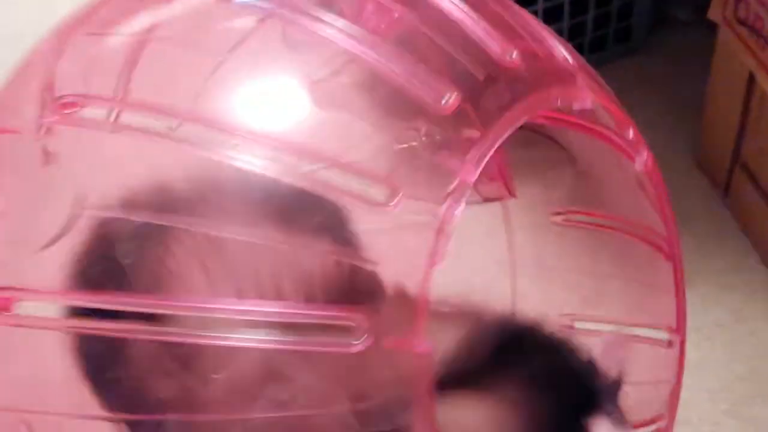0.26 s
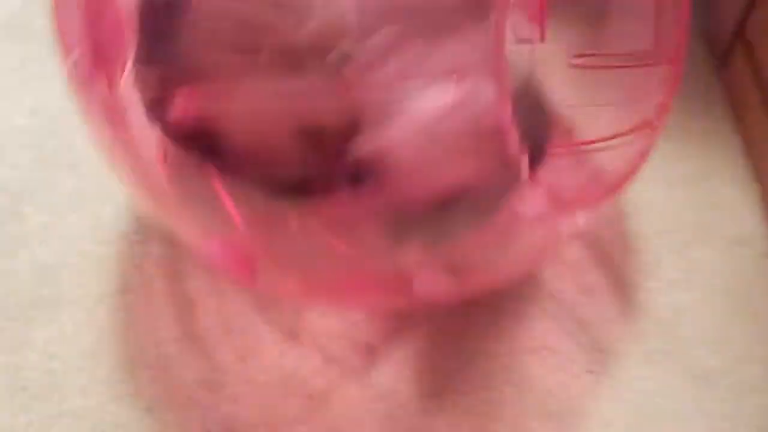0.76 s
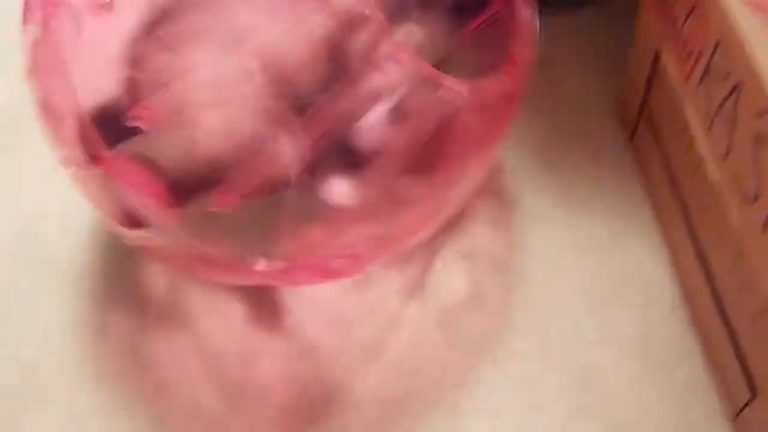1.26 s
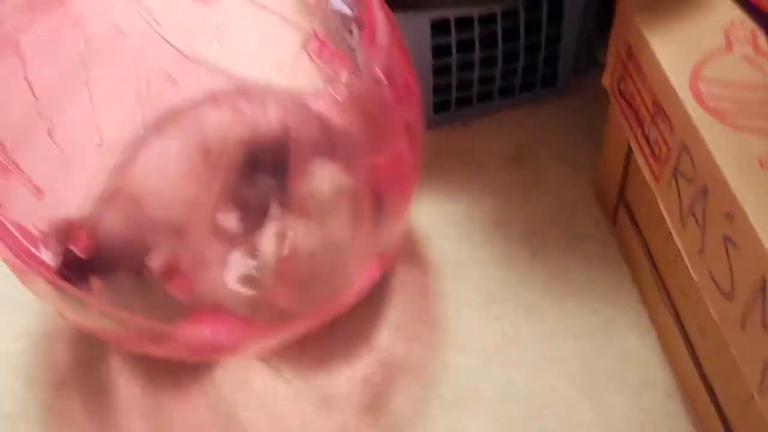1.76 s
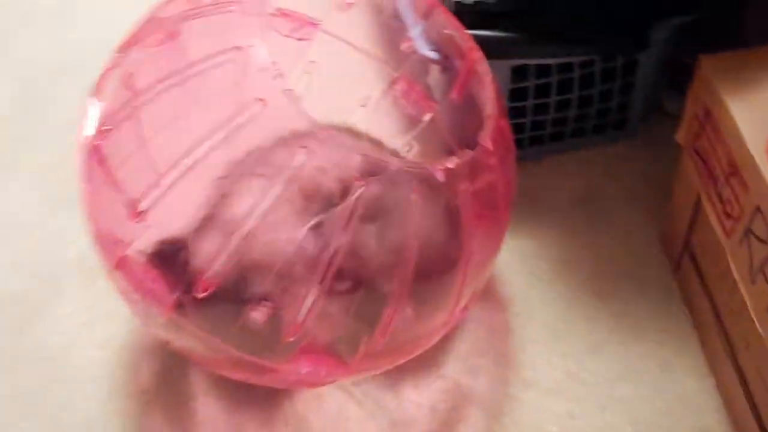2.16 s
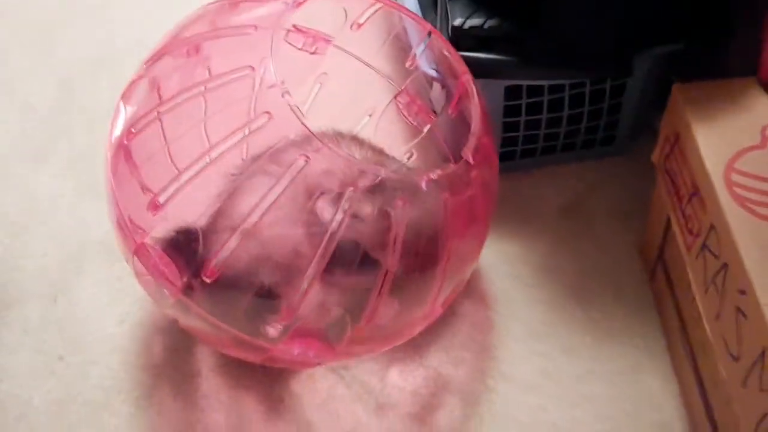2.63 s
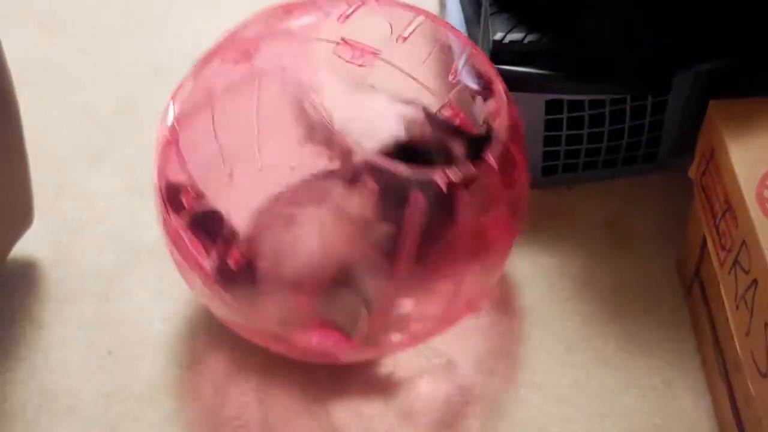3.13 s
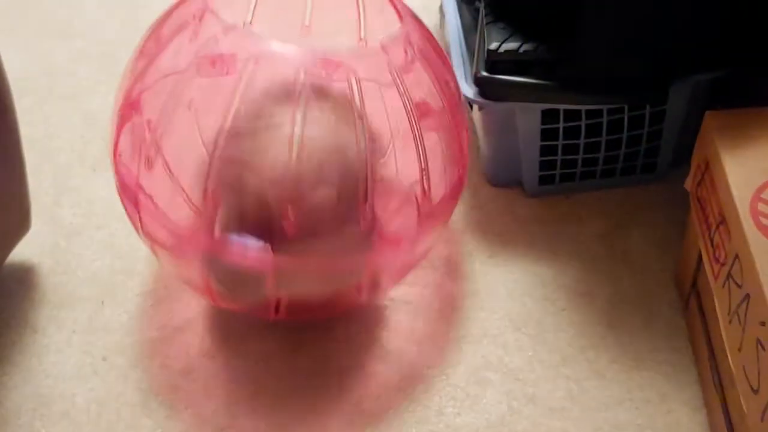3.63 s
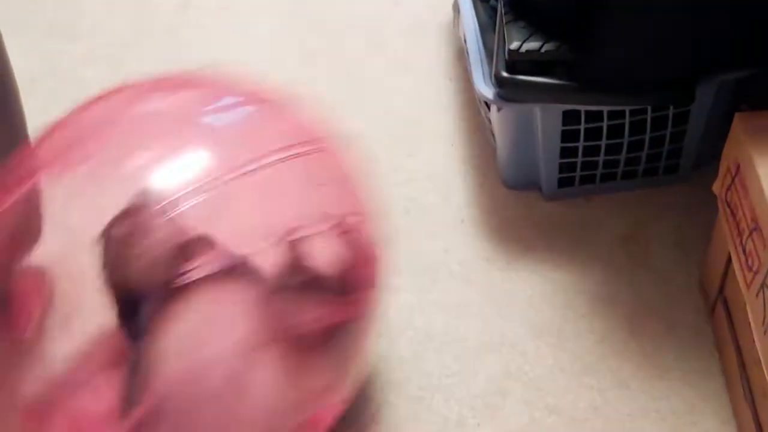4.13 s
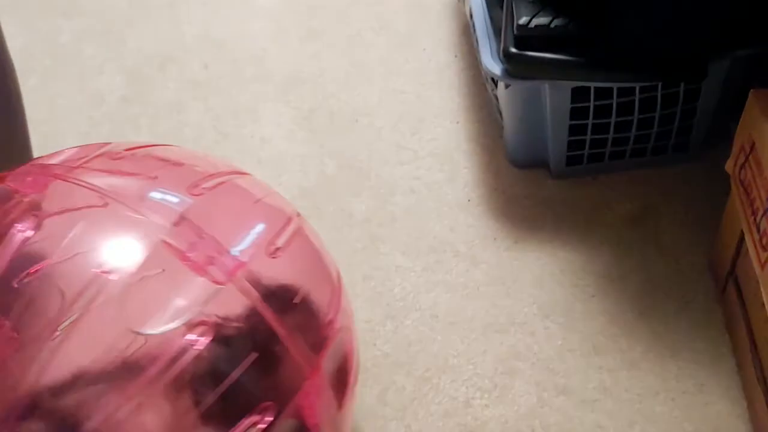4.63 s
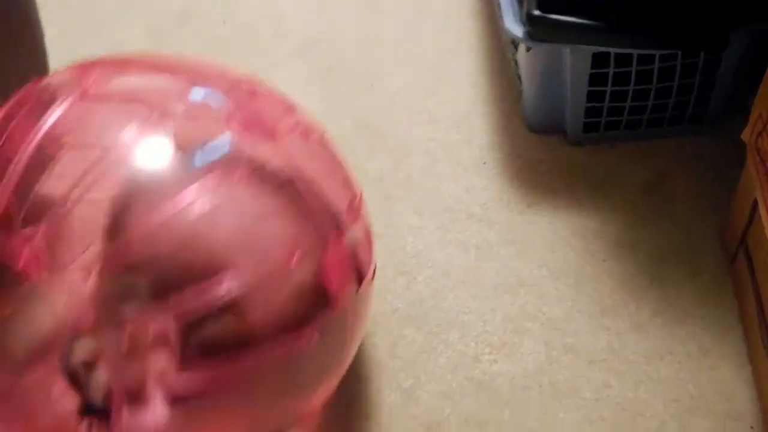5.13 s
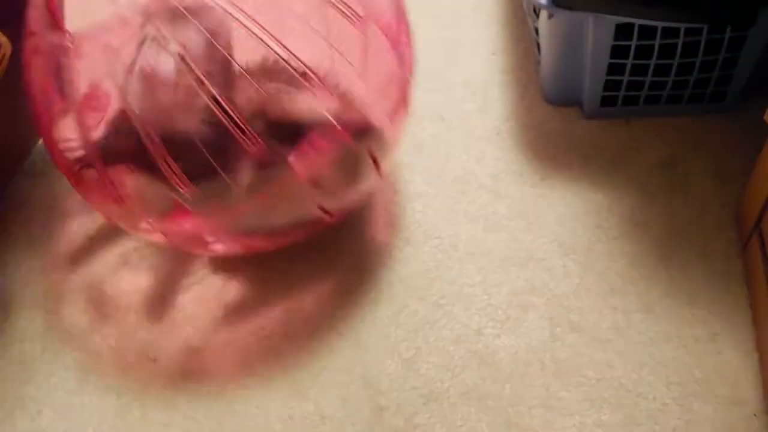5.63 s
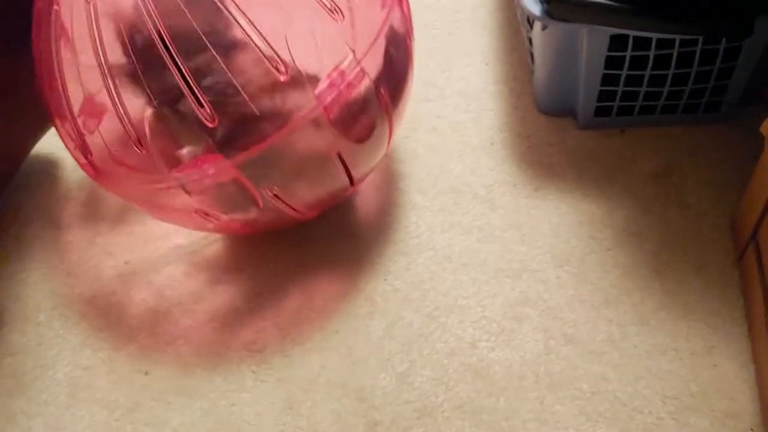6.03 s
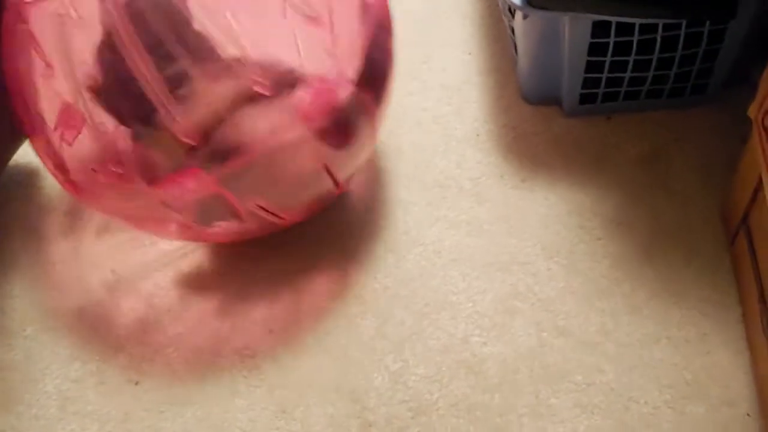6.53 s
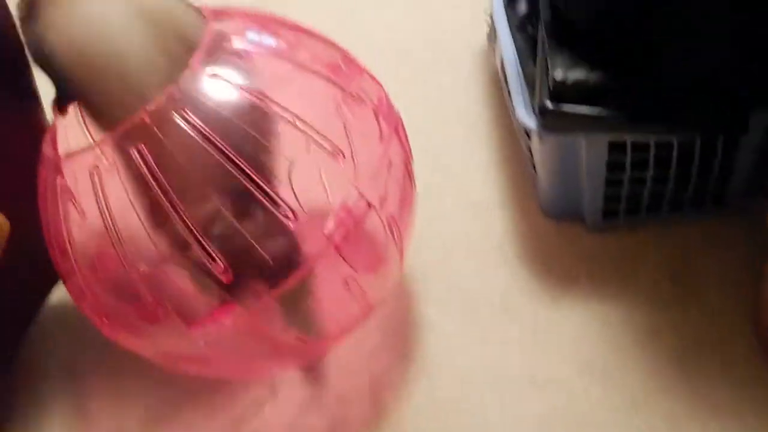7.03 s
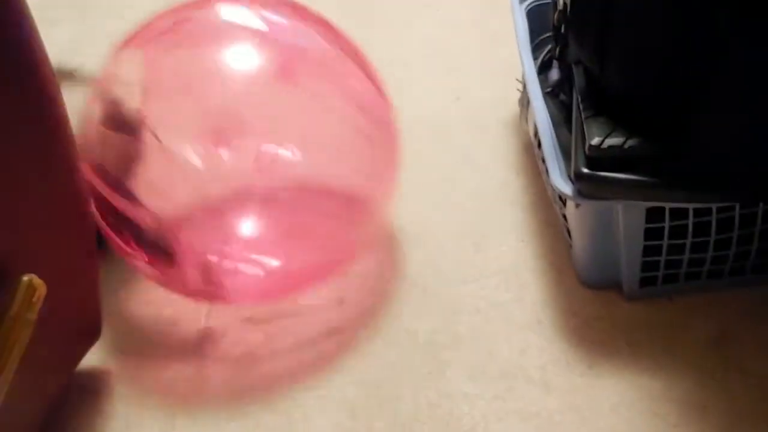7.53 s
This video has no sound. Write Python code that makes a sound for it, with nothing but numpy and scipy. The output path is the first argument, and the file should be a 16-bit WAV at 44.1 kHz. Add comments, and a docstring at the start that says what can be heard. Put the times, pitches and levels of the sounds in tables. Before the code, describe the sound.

A hollow plastic ball knocks and clatters on carpet as an animal inside scrabbles with ticking claws, over a steady humming fan.

```python
"""A fan hums and hisses in a small furnished room: wavering blade tones over coloured noise.
A step from a hand-held microphone a ferret scrambles in a hollow plastic exercise ball on a carpet.
Claws tick and scrape, and the body knocks: each blow rings hundreds of shell modes and the air inside.
Low flexing modes thud, shaped noise makes the rolling and the fur, and gliding sines make the squeaks."""
import sys
import numpy as np
from scipy import signal
from scipy.fft import rfft, irfft, next_fast_len
from scipy.io import wavfile
from scipy.ndimage import uniform_filter1d

SR = 44100
rng = np.random.default_rng(int(sys.argv[2]) if len(sys.argv) > 2 else 0)


def pcm_store(signal):
    """Save signal as 16-bit PCM."""
    levels = np.round(np.clip(np.atleast_2d(signal), -1, 1) * 32767)
    wavfile.write(sys.argv[1], SR, levels.astype(np.int16).T)


N = 342965
RING = np.arange(int(.2 * SR)) / SR  # time axis of one short ringing sound, s


def undb(db):
    """Decibels to gain."""
    return 10 ** (np.asarray(db) / 20)


def unit(x):
    """Scale to rms 1."""
    return x / np.sqrt(np.mean(x ** 2) + 1e-20)


def colour_db(hz, points):
    """Read a spectrum on a log-frequency axis."""
    f, db = np.transpose(points)
    return np.interp(np.log(np.maximum(hz, 1)), np.log(f), db)


def bump(f, hz, width_hz):
    """Bell of height 1 round one frequency."""
    return np.exp(-((f - hz) / width_hz) ** 2)


def fade(t, t60):
    """Exponential decay, 60 dB in t60 seconds."""
    return np.exp(-np.log(1000) * t / np.maximum(t60, .005))


def add(track, s, sound):
    """Mix a sound into a track at time s in seconds."""
    i = max(int(s * SR), 0)
    part = track[i:i + len(sound)]
    part += sound[:len(part)]


def shaped(x, gain):
    """Filter by a gain given as a function of Hz."""
    size = next_fast_len(x.shape[-1] + len(RING))
    hz = np.arange(size // 2 + 1) * SR / size
    return irfft(rfft(x, size) * gain(hz), size)[..., :x.shape[-1]]


def walk(rate):
    """Random drift with a spread near 1, through a new random value rate times a second."""
    t = np.arange(N) / SR * rate
    count = int(t[-1]) + 2
    return 0.77 * np.interp(t, np.arange(count), rng.standard_normal(count))


def fan(air_db=-45, flutter_db=1, deep_hz=170, hiss_db=0.75):
    """Blade tones that waver a little over rushing air; the bass is alike in both ears."""
    # Hum where the moving microphone is. Each row: time in seconds, level in dB.
    hum_level = [(0.0, -57), (0.65, -62), (0.84, -56), (1.51, -55), (1.93, -48), (2.03, -50), (2.86, -50),
                 (3.1, -46.5), (3.66, -46), (3.94, -54), (4.35, -52.5), (4.72, -53.5), (5.2, -48),
                 (5.87, -49.5), (6.08, -55), (6.41, -57.5), (6.84, -51), (7.78, -49)]
    # Blade tones. Each row: pitch in Hz, level in dB against the hum level.
    blade_tones = [(234.8, 1), (63.6, -15), (361, -13), (197.5, -16.5)]
    # Spectrum of the rushing air. Each row: frequency in Hz, relative density in dB per Hz.
    air_spectrum = [(15, -59), (25, -22.5), (60, -8.5), (92, -10), (129, -8), (204, -19.5), (236, -1),
                    (260, -11.5), (356, -14.5), (421, -19.5), (487, -17.5), (619, -20.5), (2070, -20),
                    (7090, -30.5), (8000, -46), (10400, -72), (17600, -120)]
    # Hollows and humps the room gives the air noise. Each row: centre in Hz, width in Hz, lift in dB.
    room_colour = [(241.4, 17.6, -7), (273, 130, 1), (966, 97, 3.5), (1346, 190, -2.5), (1980, 260, 2),
                   (6080, 1370, -6), (7100, 530, 2)]
    # Stereo spread of the air. Each row: frequency in Hz, side against mid in dB.
    air_spread = [(60, -33), (250, -50), (500, -17), (900, -34.5), (1560, -14), (2700, -27.5),
                  (4600, -46.5), (8000, -34)]
    # The deep rumble. Each row: time in seconds, lift in dB.
    deep_level = [(0, 5), (0.45, 2.5), (1.6, -2), (2.9, 0.5), (3.5, -3), (4.2, 4.5), (4.9, 0), (6.6, 1),
                  (7.2, -1), (7.78, 1.5)]

    t = np.arange(N) / SR
    hum_db = np.interp(t, *np.transpose(hum_level))
    turns = np.cumsum(1 + 0.0028 * walk(4.04)) / SR  # time axis of slightly uneven blades
    hum = np.zeros(N)
    for hz, db in blade_tones:
        hum += undb(db + flutter_db * walk(16)) * np.sqrt(2) * np.sin(2 * np.pi * hz * turns)

    def air_gain(f):
        """Smooth rush, coloured by the room."""
        colour = sum(db * bump(f, hz, width) for hz, width, db in room_colour)
        return undb(colour_db(f, air_spectrum) + colour)

    mid, side = unit(shaped(rng.standard_normal((2, N)), air_gain))
    side = shaped(side, lambda f: undb(colour_db(f, air_spread)))
    deep = shaped(mid, lambda f: 1 / (1 + (f / deep_hz) ** 8))
    hiss = mid - deep + np.array([[1], [-1]]) * side
    hiss = hiss * undb(hiss_db + .5 * walk(8.1))
    air = hiss + deep * undb(np.interp(t, *np.transpose(deep_level)))
    return undb(air_db) * air + hum * undb(hum_db)


def room(x, wet_db=-15, t60_s=0.17, width=0.19, right_db=1.5, early_db=-13):
    """Carpet and furniture leave a short dull tail; the middle tones reach the right ear more strongly."""
    apart = np.array([[-1], [1]])  # left and right in opposite sense
    mid, side, early = rng.standard_normal((3, len(RING))) * fade(RING, t60_s)
    side = width * shaped(side, lambda f: f / (f + 600))
    tail = (mid + apart * side) * (1 - np.exp(-(RING / 0.0061) ** 2))
    tail = tail / np.sqrt(np.sum(tail[0] ** 2))
    tail = shaped(tail, lambda f: 1 / np.sqrt(1 + (f / 4500) ** 2))

    def lean_gain(f):
        """Half of the level difference, widest near 2100 Hz."""
        return (undb(right_db / 2) - 1) * np.exp(-np.log2((f + 1) / 2100) ** 2 / 1.1)

    def glance_gain(f):
        """The scattered echo carries little bass and a softened top."""
        return f ** 3 / (f ** 3 + 850 ** 3) / np.sqrt(1 + (f / 5000) ** 2)

    lean = shaped(x, lean_gain)
    # a short scattered echo reaches the two ears differently
    early = early * fade(RING, .02)
    early = early / np.sqrt(np.sum(early ** 2))
    glance = shaped(signal.fftconvolve(x, early)[:N], glance_gain)
    wet = signal.fftconvolve(x[None], tail, axes=1)[:, :N]
    return x + apart * (lean + undb(early_db) * glance) + undb(wet_db) * wet


def shell_modes(count=420, spread_s=0.00075, hold_s=0.28):
    """The thin shell has crowded modes. Returns pitches, levels and ringing waves."""
    # Broad response of the shell. Each row: frequency in Hz, level in dB.
    shell_response = [(300, -8), (450, -8.5), (620, -0.5), (800, -4), (1100, 3), (1500, 1), (2000, 0.5),
                      (2600, -1), (3700, -1), (5200, -7.5), (6200, -8), (7100, -3.5), (8200, -17.5)]
    # Modes that stand out of the crowd. Each row: pitch in Hz, width in Hz, lift in dB.
    shell_peaks = [(1052, 29, 4), (1283, 31, 1.5), (2000, 18, 2.5), (2166, 33, 4.5), (3513, 21, 3.5),
                   (7100, 110, 4)]
    hz = 300 + (np.arange(count) + rng.random(count)) * 8000 / count
    db = colour_db(hz, shell_response) + sum(lift * bump(hz, f, w) for f, w, lift in shell_peaks)
    # slow low bending waves take longer to spread round the shell, and they ring longest
    slow = 1500 / hz[:, None]  # spread_s and hold_s hold at 1500 Hz
    swell = 1 - np.exp(-RING / (spread_s * slow ** 1.2))
    turn = 2 * np.pi * hz[:, None] * RING + rng.uniform(0, 2 * np.pi, (count, 1))
    return hz, db, np.sin(turn) * swell * fade(RING, hold_s * slow ** 0.94)


def strike(modes, tilt_db, spot_hz, t60, spot_db=7.5, spot_octaves=0.26, patchy_db=2.5, size=7):
    """Each contact point favours its own groups of neighbouring modes; a hard claw stirs the high ones."""
    hz, db, waves = modes
    spot = spot_db * np.exp(-(np.log2(hz / spot_hz) / spot_octaves) ** 2)
    lobes = patchy_db * np.sqrt(size) * uniform_filter1d(rng.standard_normal(len(hz)), size)
    push = undb(db + tilt_db * np.log2(hz / 1500) + spot + lobes)  # tilt in dB per octave
    ring = (push * rng.choice([-1, 1], len(hz))) @ waves
    ring = ring * fade(RING, t60)  # on top of each mode's own decay
    return ring / np.sqrt(np.mean(ring[:int(.008 * SR)] ** 2))  # rms 1 over the first 8 ms


def boom(hz, t60, rise_s):
    """One low resonance pushed softly; rms near 1 at its start."""
    return 2 * np.sin(2 * np.pi * hz * RING) * fade(RING, t60) * (1 - np.exp(-RING / rise_s))


def blow(modes, db, tilt_db, spot_hz, air_db, t60, cavity_hz=289, cavity_t60_s=0.078):
    """One blow rings the shell and the air it holds."""
    shell = undb(db) * strike(modes, tilt_db, spot_hz, t60)
    return shell + undb(air_db) * boom(cavity_hz, cavity_t60_s, 0.0012)


def patter(modes, count=60, patter_db=-51):
    """Faint touches of paws, scattered at random, each ringing the shell."""
    out = np.zeros(N)
    for when, size, hard in rng.random((count, 3)):
        touch = strike(modes, 5 * hard - 3, 900 * 4 ** hard, 0.054)
        add(out, when * N / SR, undb(patter_db + 3.6 * size) * touch)
    return out


def fur(start_s=2.965, length_s=0.095, fur_db=-42.0, grain_db=3):
    """Fur brushes unevenly over the rim of the opening as the head pokes out: two bands of noise."""
    n = int(length_s * SR)
    noise = rng.standard_normal(N)[:n]
    hiss = shaped(noise, lambda f: bump(f, 4200, 450) + 0.36 * bump(f, 7000, 800))
    brush = unit(hiss * undb(grain_db * walk(250)[:n]))
    out = np.zeros(N)
    add(out, start_s, undb(fur_db) * brush * np.sin(np.pi * np.arange(n) / n))
    return out


def squeaks(sag=0.084, judder=0.66):
    """A skidding pad makes one shell mode sing unevenly, falling slightly as it slows."""
    # Paws skidding on smooth plastic. Each row: start in seconds, length in seconds,
    # middle pitch in Hz, level in dB before the uneven grip.
    skids = [(5.971, 0.026, 1195, -31), (6.02, 0.017, 1340, -33.5), (6.08, 0.034, 1195, -45),
             (6.13, 0.04, 1300, -38)]
    out = np.zeros(N)
    grip = 1 + judder * walk(300)
    for s, length, hz, db in skids:
        u = np.linspace(0, 1, int(length * SR))
        tone = np.sin(2 * np.pi * np.cumsum(hz * (1 + sag * (.5 - u))) / SR)
        add(out, s, undb(db) * np.sqrt(2) * tone * np.sin(np.pi * u) ** 2)
    return out * grip


def rumble(start_s=4.215, t60=0.82, rumble_db=-33, centre_hz=150):
    """After a run of hard knocks the ball trundles over the carpet and settles: fading low noise."""
    t = np.arange(int(.6 * SR)) / SR

    def roll_gain(f):
        """Broad hump round the centre, steep above 550 Hz."""
        return f * centre_hz / (f ** 2 + centre_hz ** 2) / (1 + (f / 550) ** 4)

    roll = unit(shaped(rng.standard_normal(len(t)), roll_gain))
    out = np.zeros(N)
    add(out, start_s, undb(rumble_db) * roll * fade(t, t60) * (1 - np.exp(-t / 0.0031)))
    return out


def thuds(reach_octaves=0.37):
    """The loaded ball drops back on the carpeted floor; a slower push stirs lower flexing modes."""
    # Weight landing on the floor. Each row: time in seconds, level of the push in dB,
    # pitch that the push favours in Hz.
    landings = [(1.231, -24.5, 92), (1.233, -22, 420), (1.255, -30.5, 180), (3.795, -29.5, 220),
                (4.166, -29.5, 560), (4.172, -24.5, 205), (4.201, -20, 143), (4.288, -33, 183),
                (7.755, -35, 217)]
    # Low flexing modes of the loaded ball. Each row: pitch in Hz, level in dB, t60 in seconds.
    flex_modes = [(68, -2, 0.15), (99.5, -0.5, 0.14), (149, 0, 0.11), (180, -3, 0.11), (220, 0.5, 0.11),
                  (355, -4, 0.19), (492, -0.5, 0.11), (560, 1, 0.064)]
    out = np.zeros(N)
    for s, db, push_hz in landings:
        flex = np.zeros(len(RING))
        for hz, mode_db, t60 in flex_modes:
            reach = np.exp(-(np.log2(hz / push_hz) / reach_octaves) ** 2)
            flex += undb(mode_db) * reach * boom(hz, t60, 0.0015)
        add(out, s, undb(db) * flex * (1 - RING / RING[-1]) ** .5)
    return out


def scrapes(modes, slips_per_s=200, spread_db=3, count=4):
    """Each dragged claw catches and slips in a quick uneven run of tiny blows on its own spot."""
    # Bouts of claws dragged over the shell. Each row: start in seconds, length in seconds,
    # level in dB, tilt in dB per octave.
    drags = [(0.148, 0.093, -43.5, 1), (0.58, 0.12, -46, 1.5), (0.815, 0.073, -37.5, 2),
             (1.034, 0.028, -43.5, 6), (1.255, 0.031, -33.5, -3), (2.916, 0.048, -45.5, 9.5),
             (3.21, 0.037, -40, -1), (3.427, 0.12, -48, 1.5), (3.9, 0.18, -46, 2),
             (4.221, 0.095, -40.5, -3.5), (4.424, 0.043, -47.5, 5), (4.962, 0.079, -43, -0.5),
             (6.075, 0.14, -37, 3), (6.301, 0.15, -43, 0)]
    out = np.zeros(N)
    for s, length, db, tilt_db in drags:
        n = int(length * SR)
        swell = np.sin(np.pi * (np.arange(n) + .5) / n) ** .5
        chance = rng.random((count, len(RING)))[:, :n]
        size = rng.standard_normal((count, len(RING)))[:, :n]
        slips = (chance < slips_per_s / SR) * undb(spread_db * size) * swell
        run = 0
        for claw in slips:
            run = run + signal.fftconvolve(claw, strike(modes, tilt_db, 1200 * 4 ** rng.random(), 0.027))
        add(out, s, undb(db) * run * np.sqrt(n / (np.sum(run ** 2) + 1e-9)))
    return out


def blows(modes):
    """Heavy knocks of the body and the rolling ball, and light hard claw ticks, ring shell and air."""
    # Knocks. Each row: time in seconds, level in dB, hardness as tilt in dB per octave, resonance of
    # the struck spot in Hz, boom of the air inside in dB, t60 of the added fade in seconds.
    heavy_knocks = [(0.302, -25.5, -8, 1600, -45, 0.027), (0.305, -22, -6.5, 780, -40, 0.025),
                    (0.619, -32, -4.5, 900, -41.5, 0.056), (0.922, -37.5, -5, 2860, -62, 0.03),
                    (1.232, -13.5, -3, 1100, -28.5, 0.053), (1.239, -16, -2.5, 800, -38, 0.075),
                    (1.251, -16.5, -5, 1890, -32, 0.06), (1.319, -42, -5.5, 1820, -40, 0.05),
                    (1.362, -53, -24, 900, -40, 0.035), (2.73, -26.5, -3, 1480, -37, 0.056),
                    (3.216, -35, -4, 574, -38, 0.062), (3.379, -39, -7, 1200, -57, 0.061),
                    (3.794, -22, 1, 2000, -22, 0.025), (3.801, -21.5, -7.5, 1200, -56, 0.05),
                    (3.842, -29, -1.5, 1570, -39, 0.05), (4.008, -27.5, -0.5, 1420, -50, 0.083),
                    (4.062, -33.5, 0, 1140, -57, 0.088), (4.161, -14, -3, 2230, -25.5, 0.066),
                    (4.17, -17, -0.5, 2680, -21.5, 0.054), (4.184, -19.5, -3, 1850, -29, 0.069),
                    (4.195, -25.5, -2, 1700, -40, 0.09), (4.251, -32.5, -2, 1880, -49, 0.036),
                    (4.287, -33.5, 0, 910, -44, 0.11), (4.342, -28.5, -3.5, 2170, -36.5, 0.047),
                    (4.484, -34, -8, 1000, -55, 0.071), (4.72, -29, -7, 536, -33.5, 0.036),
                    (4.985, -33.5, -3.5, 1960, -36.5, 0.041), (6.807, -25, -2, 1110, -25, 0.044),
                    (7.462, -29.5, -8, 1150, -34, 0.084)]
    # Single claws. Each row: time in seconds, level in dB, resonance of the struck spot in Hz.
    claw_ticks = [(0.165, -42.5, 2200), (0.219, -42.5, 1300), (0.258, -33.5, 2640), (0.289, -32.5, 2000),
                  (0.339, -29.5, 2350), (0.672, -38.5, 3400), (0.687, -37.5, 3040), (0.723, -41.5, 1490),
                  (0.814, -38, 3500), (0.845, -30.5, 1990), (0.857, -28.5, 4200), (0.864, -31, 3700),
                  (1.047, -39.5, 4320), (2.814, -43.5, 3600), (3.199, -32.5, 1500), (3.639, -38.5, 1950),
                  (3.692, -35.5, 3670), (3.756, -41.5, 5030), (3.89, -31, 1890), (3.896, -30, 2760),
                  (4.02, -29, 2030), (4.31, -38, 2880), (4.446, -43.5, 3850), (4.63, -40, 4870),
                  (4.999, -30.5, 1950), (5.389, -32.5, 1240), (5.417, -33.5, 4350), (5.924, -39, 1400),
                  (6.008, -38, 5740), (6.042, -35.5, 4600), (6.073, -36.5, 1190), (6.093, -33, 1410),
                  (6.136, -33.5, 1300), (6.146, -36.5, 2400), (6.175, -24, 3200), (6.319, -33.5, 2960),
                  (6.356, -36.5, 2470), (6.366, -36, 4600), (6.41, -31, 2970), (6.637, -41, 1400),
                  (6.82, -30.5, 4300), (6.86, -31.5, 4230), (6.911, -30.5, 2600)]
    # a claw is hard (dB per octave) and barely stirs the air inside (dB against its tick)
    claw_tilt_db, claw_boom_db, claw_t60_s = 2, -18, 0.057
    out = np.zeros(N)
    for s, *knock in heavy_knocks:
        add(out, s, blow(modes, *knock))
    for s, db, spot_hz in claw_ticks:
        add(out, s, blow(modes, db, claw_tilt_db, spot_hz, db + claw_boom_db, claw_t60_s))
    return out


def scene():
    """The ball in the room, over the fan."""
    modes = shell_modes()
    ball = blows(modes) + scrapes(modes) + patter(modes) + thuds() + rumble() + squeaks() + fur()
    return room(ball) + fan()


def record(dry, top_hz=7900):
    """The recorder rounds the loudest peaks and cuts the top."""
    rounded = np.tanh(1.104 * dry) / 1.094
    return signal.sosfilt(signal.ellip(10, .2, 70, top_hz, fs=SR, output="sos"), rounded)


dry = scene()
out = record(dry)
pcm_store(out)
```